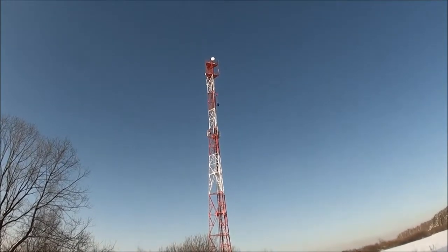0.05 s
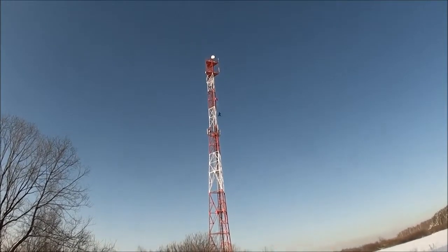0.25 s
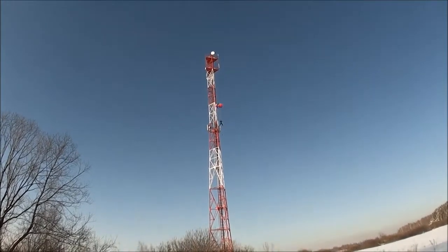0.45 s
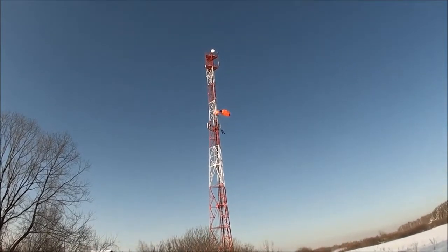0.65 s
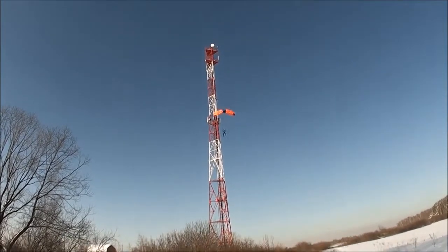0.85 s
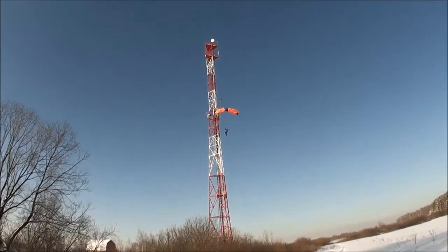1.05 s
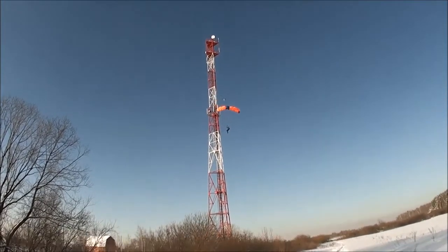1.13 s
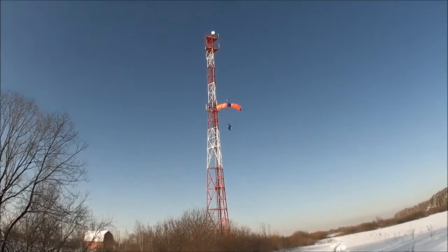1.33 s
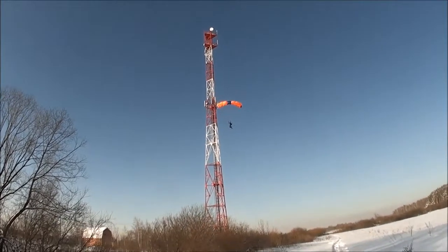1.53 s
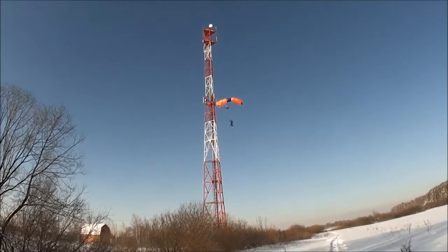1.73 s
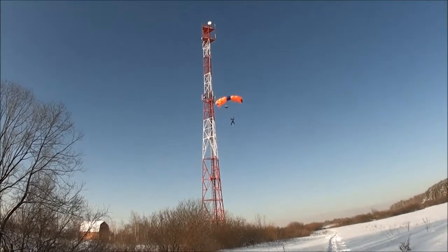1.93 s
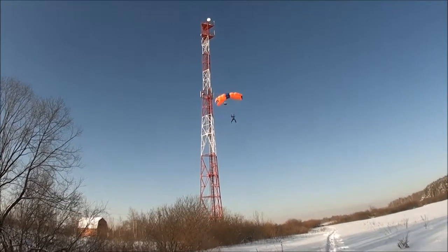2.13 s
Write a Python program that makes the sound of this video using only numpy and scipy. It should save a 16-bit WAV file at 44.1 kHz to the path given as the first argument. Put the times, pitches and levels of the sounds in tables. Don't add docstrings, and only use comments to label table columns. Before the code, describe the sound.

Parachute fabric bursts open with flapping and sharp cracks outdoors, while a nearby camera shutter fires five times

```python
import sys
import numpy as np
from scipy import signal
from scipy.fft import rfft, irfft
from scipy.io import wavfile
from scipy.ndimage import uniform_filter1d

SR = 44100
rng = np.random.default_rng(int(sys.argv[2]) if len(sys.argv) > 2 else 0)


def magnitude_from_level(level_db):
    exponent = np.asarray(level_db, float) / 20
    return 10 ** exponent


def wav_record(signal):
    frames = np.transpose(np.atleast_2d(signal))
    bounded = np.clip(frames, -1, 1)
    quanta = np.round(bounded * 32767).astype(np.int16)
    wavfile.write(sys.argv[1], SR, quanta)


N = 97020

# start_s, level_db, extra_wait_before_curtains_s
FRAME_SHOTS = [
    (0.2386, -1.5, 0.001073),
    (0.5485, -2.5, 0.0013),
    (0.8594, -4.5, 0.0011),
    (1.5096, -3, 0.000325),
    (1.8177, -2.5, 0.00018),
]
# time_after_slap_s, thump_db, snap_db, ring_db, rattle_t60_s
FRAME_BLOWS = [
    (-.021, -23, -18, -40, 0.16),
    (0, -18, -11.5, -14, 0.038),
    (.010, -7.5, -18.5, -27, 0.056),
    (.027, -42, -25, -18.5, 0.06),
    (.0332, -10.5, -7.5, -42, 0.058),
    (.0435, -11, -9.5, -17, 0.055),
    (.0998, -24.5, -12, -5.5, 0.066),
    (.107, -12.5, -20, -10.5, 0.17),
]
# time_after_slap_s, level_db
CURTAIN_STOPS = [
    (0, -5),
    (.0335, -3),
    (.0438, -3),
    (.1, -7),
]
# pitch_hz, level_db, t60_s
BODY_THUMP = [(280.2, -4.5, 0.054), (370.4, -3.5, 0.015), (700, -5.5, 0.0086), (838.5, -7, 0.061)]
BODY_RING = [(1807, -6.5, 0.041), (2913, 0, 0.014), (3580, 3, 0.019), (3787, -17.5, 0.073),
             (4010, 3.5, 0.0097), (5220, -7.5, 0.026)]
MIRROR_SLAP = [(270, -10, 0.019), (293, -30.5, 0.17), (242, -12.5, 0.14), (390, -6, 0.0071),
               (870, -24, 0.024)]
MIRROR_KNOCK = [(556, -1.5, 0.0035), (742, -13, 0.048)]
CURTAIN_BLADES = [(4520, -6, 0.01), (5080, -11.5, 0.013), (6200, -18, 0.0058), (7200, -24, 0.013),
                  (8520, -7.5, 0.011), (9660, -12, 0.013), (14900, -22, .008), (15600, -28, .006)]
SHUTTER_BUTTON = [(985, -20, 0.023), (1400, -29, 0.014), (2120, -26, 0.019), (3780, -38, 0.011)]
# pitch_hz, level_db
SNAP_TONE = [(350, -47.5), (600, 3), (2500, -2.5), (4580, -8), (5400, -6.5), (9620, -5), (12200, -29.5),
             (14500, -36), (16000, -39)]
GRIND_TONE = [(88, -1), (150, 9.5), (1260, -1.5), (1980, 8), (2500, 0), (3840, -0.5), (5050, -1),
              (5790, -5), (16000, -22.5)]
# time_after_slap_s, gear_mesh_hz, level_db, whine_share_db
MOTOR_WIND_UP = [(-.054, 1400, -34, -14), (-.042, 1529, -32.5, 5), (-.026, 1980, -30.5, 3.5),
                 (-.016, 2150, -32, -6), (-.002, 2200, -22.5, -36), (0.018, 2200, -24, -10)]
MOTOR_RECOCK = [(.05, 1800, -45, -1), (.066, 2000, -30.5, -12), (.076, 2070, -27, 0.5),
                (.094, 1750, -24.5, 1.5), (0.112, 1760, -26, -15), (.124, 1880, -32.5, 7.5),
                (.158, 1955, -29.5, 5), (0.173, 1897, -28.5, 2), (.187, 1540, -41, -3)]
# multiple_of_mesh, level_db
RECOCK_WHINE = [(.44, -7), (.9, -7), (1, -8), (2, -3), (3, 0.5), (4, -13)]
WIND_UP_WHINE = [(1, -6.5), (2, -1), (3, -0.5), (4, -22)]
# time_s, flap_level_db, rustle_minus_flap_db
CANOPY_COURSE = [(0.304, -51.5, 2), (0.46, -45, -0.5), (.66, -30, 2), (0.731, -26.5, -0.5),
                 (0.793, -20.5, -4), (0.829, -21, 2.5), (0.869, -14.5, -3), (0.925, -18.5, 0),
                 (.96, -23.5, 2), (1.03, -24.5, 3.5), (1.053, -27.5, 6.5), (1.098, -25.5, -0.5),
                 (1.195, -21.5, -8), (1.23, -33.5, 0.5), (1.3, -38, 2), (1.37, -41.5, -1.5),
                 (1.44, -38.5, -5.5), (1.749, -76, -1)]
# time_s, peak_db, pitch_hz
LOOSE_FLAPS = [(0.803, -10, 256), (0.83, -8, 228), (0.836, -14, 242), (.851, -5.5, 659), (.866, -4.5, 263),
               (0.878, -13.5, 238), (.885, -4, 197), (0.91, -2, 732), (1.038, -14, 228), (1.125, -14, 453),
               (1.161, -10.5, 223), (1.176, -12.5, 257), (1.19, -17.5, 296), (1.203, -14, 700),
               (1.214, -16, 198), (1.228, -31, 258), (1.257, -25, 800), (1.273, -27, 504),
               (1.342, -30, 536), (1.425, -32, 255), (1.444, -36, 300)]
# time_s, level_db
FABRIC_CRACKS = [(.741, -19), (.842, -18), (.861, -15), (.912, -24), (0.918, -17), (.995, -14),
                 (1.028, -27), (1.041, -11), (1.054, -9.5), (1.066, -20), (1.124, -13.5), (1.131, -20),
                 (1.143, -16), (1.256, -27), (1.338, -36), (1.404, -36), (1.469, -30)]
# pitch_hz, level_db
FLAP_TONE = [(40, -26), (100, -2), (174, 5), (270, 2), (459, -9.5), (650, -1), (1710, -23), (5000, -73)]
RUSTLE_TONE = [(350, -17), (700, 4.5), (1500, 0.5), (2600, -6.5), (3600, -7), (8000, -17), (11000, -31),
               (16000, -59)]
RUMBLE_TONE = [(24, -57), (40, -19), (92, -16), (127, -7), (203, -4.5), (314, -4.5), (475, -15),
               (605, -10.5), (2500, -36), (3250, -61), (5500, -120)]
HISS_TONE = [(1200, 4), (1800, 1), (2600, -3.5), (3500, -1.5), (6400, -4.5), (9000, -6.5), (12000, -9.5),
             (16300, -12.5)]
# pitch_hz, level_db
MIC_TONE = [(30, -12.5), (140, -5), (330, 3.5), (470, 0), (650, -0.5), (2000, -1.5), (2600, -6), (3100, 3)]
# pitch_hz, level_db
CAMERA_ASIDE = [(150, -18), (600, -19), (1300, 2.5), (2400, -3), (4500, -6.5), (8000, -8.5), (12000, -12)]

GRIND_DB, WHINE_DB = -1, -5
WOBBLE_DB, FLUTTER = 3.8, .006
SLAP_LAG_S, KNOCK_LAG_S = .0021, .0014
SNAP_T60_S, RISE_S, RING_RISE_S = .011, .0014, .0018
BOUNCE_THUMP_DB = -9
LATCH_S, LATCH_LENGTH_S, LATCH_HZ, LATCH_DB = .002, .014, 4510, -31.5
BUTTON_S = .1752
FLAPS_PER_S, CRACKLES_PER_S = 500, 3000
FLAP_SPREAD_DB, CRACKLE_SPREAD_DB, GUST_DB = 1.5, 2.2, 3.2
RUMBLE_DB, HISS_DB, DRIFT_DB = -44, -49, 1.6
ECHO_DB, ECHO_T60_S = -14, .15
ASIDE_TURN = 1.15
CEILING, TOP_HZ = 1.15, 15900


def noise(size):
    return rng.standard_normal(size)


def colour(x, points):
    p = np.array(points)
    hz = np.arange(1025) * SR / 2048 + 1
    db = np.interp(np.log(hz), np.log(p[:, 0]), p[:, 1], left=p[0, 1] - 20)
    c = irfft(np.log(magnitude_from_level(db)))
    c[1:1024] *= 2
    c[1025:] = 0
    h = irfft(np.exp(rfft(c)))
    return signal.fftconvolve(x, h / np.sqrt(np.sum(h ** 2)))[:len(x)]


def fade(t, t60):
    return (t >= 0) * np.exp(-np.log(1000) * np.abs(t) / t60)


def rise(t, length_s):
    return np.clip(t / length_s, 0, 1)


def modes(t, table):
    out = 0
    for hz, db, t60 in table:
        pitch = hz * (1 + 0.017 * rng.standard_normal())
        out = out + magnitude_from_level(db) * fade(t, t60) * np.sin(2 * np.pi * pitch * t)
    return out


def walk(rate, size):
    k = int(SR / rate)
    w = uniform_filter1d(uniform_filter1d(noise(size), k), k)
    return w / w.std()


def motor(t, run, orders):
    s, mesh_hz, db, share_db = np.array(run).T
    speed = np.interp(t, s, mesh_hz) * (1 + FLUTTER * walk(200, len(t)))
    phase = 2 * np.pi * np.cumsum(speed) / SR
    whine = sum(magnitude_from_level(d + WOBBLE_DB * walk(380, len(t))) * np.sin(k * phase) for k, d in orders)
    grind = colour(noise(len(t)), GRIND_TONE) * magnitude_from_level(2.0 * walk(180, len(t)))
    loudness = magnitude_from_level(np.interp(t, s, db, left=-99, right=-99))
    return loudness * (magnitude_from_level(WHINE_DB + np.interp(t, s, share_db)) * whine + magnitude_from_level(GRIND_DB) * grind)


def latch(t):
    shape = np.exp(-((t - LATCH_S) / LATCH_LENGTH_S) ** 4)
    return magnitude_from_level(LATCH_DB + 4.7 * walk(250, len(t))) * shape * np.sin(2 * np.pi * LATCH_HZ * t)


def blow(t, time_s, thump_db, snap_db, ring_db, t60):
    if time_s < .03:
        thump_db = thump_db + BOUNCE_THUMP_DB
    thump = -magnitude_from_level(thump_db) * modes(t - .0015, BODY_THUMP)
    decay = fade(t, SNAP_T60_S) + magnitude_from_level(-5.5) * fade(t, t60)
    snap = rise(t, RISE_S) * decay * colour(noise(len(t)), SNAP_TONE)
    ring = rise(t, RING_RISE_S) * modes(t, BODY_RING)
    return thump + magnitude_from_level(snap_db) * snap + magnitude_from_level(ring_db) * ring


def curtains(t, wait):
    out = 0
    for s, db in CURTAIN_STOPS:
        v = t - s - wait * (s > 0)
        out = out + magnitude_from_level(db) * rise(v, RISE_S) * modes(v, CURTAIN_BLADES)
    return out


def camera():
    out, t = np.zeros(N), np.arange(N) / SR
    for start, gain_db, wait in FRAME_SHOTS:
        part = slice(int((start - .08) * SR), int((start + .3) * SR))
        u = t[part] - start
        x = motor(u, MOTOR_WIND_UP, WIND_UP_WHINE) + motor(u, MOTOR_RECOCK, RECOCK_WHINE)
        x = x + modes(u - SLAP_LAG_S, MIRROR_SLAP) - modes(u - KNOCK_LAG_S, MIRROR_KNOCK)
        x = x + latch(u)
        for s, thump_db, snap_db, ring_db, t60 in FRAME_BLOWS:
            v = u - s - wait * (s > .02)
            x = x + blow(v, s, thump_db, snap_db, ring_db, t60)
        x = x + curtains(u, wait)
        out[part] += magnitude_from_level(gain_db) * x
    return out + modes(t - BUTTON_S, SHUTTER_BUTTON)


def grains(rate, spread_db):
    r = rng.random((3, N))
    clicks = (r[0] < rate / SR) * np.sign(r[1] - .5) * magnitude_from_level(-spread_db * np.log(r[2] + 1e-4))
    return clicks / np.sqrt(np.mean(clicks ** 2))


def loose_flaps(t):
    out = 0
    for s, db, hz in LOOSE_FLAPS:
        v = t - s - .001
        out = out - magnitude_from_level(db) * np.cos(2 * np.pi * hz * v) * np.exp(-(v * hz / 0.56) ** 2)
    return out


def canopy():
    t = np.arange(N) / SR
    s, db, rustle_db = np.array(CANOPY_COURSE).T
    gate = rise(t - .25, 0.12) * rise(2.1 - t, 0.12)
    flaps = colour(grains(FLAPS_PER_S, FLAP_SPREAD_DB), FLAP_TONE) * magnitude_from_level(2.0 * walk(39.5, N))
    rustle = colour(grains(CRACKLES_PER_S, CRACKLE_SPREAD_DB), RUSTLE_TONE)
    rustle = rustle * magnitude_from_level(np.interp(t, s, rustle_db) + GUST_DB * walk(53, N))
    claps = loose_flaps(t)
    crack_shape = sum(magnitude_from_level(d) * fade(t - a, 0.013) for a, d in FABRIC_CRACKS)
    cracks = colour(crack_shape * noise(N), RUSTLE_TONE)
    return gate * magnitude_from_level(np.interp(t, s, db)) * (flaps + rustle) + claps + cracks


def echo(x):
    u = np.arange(8192) / SR
    tails = rng.standard_normal((2, len(u))) * fade(u - .002, ECHO_T60_S)
    mids = signal.lfilter(*signal.butter(1, [700, 5000], "band", fs=SR), x)
    return np.array([signal.fftconvolve(mids, h / np.sqrt(np.sum(h ** 2)))[:N] for h in tails])


def field():
    mid, side, a, b = rng.standard_normal((4, N))
    rumble = colour(mid, RUMBLE_TONE) * magnitude_from_level(RUMBLE_DB + DRIFT_DB * walk(20.0, N))
    wide_rumble = colour(side, RUMBLE_TONE) * magnitude_from_level(RUMBLE_DB - 15.5)
    hiss = colour(a, HISS_TONE) * magnitude_from_level(HISS_DB)
    wide_hiss = colour(b, HISS_TONE) * magnitude_from_level(HISS_DB - 10.5)
    shared, wide = rumble + hiss, wide_rumble + wide_hiss
    return np.array([shared + wide, shared - wide])


def scene():
    cam, chute = camera(), canopy()
    hz = np.arange(N // 2 + 1) * SR / N + 1
    f, db = np.array(CAMERA_ASIDE).T
    aside = magnitude_from_level(np.interp(np.log(hz), np.log(f), db)) * np.exp(-1j * ASIDE_TURN)
    side = -irfft(rfft(cam) * aside, N)
    wet = echo(cam + 1.36 * chute)
    near = np.array([cam + side, cam - side]) + chute + magnitude_from_level(ECHO_DB) * wet
    return np.array([colour(c, MIC_TONE) for c in near]) + field()


def roll_off(x):
    return signal.sosfilt(signal.butter(12, 16700, fs=SR, output="sos"), x)


def record(dry):
    rounded = np.tanh(dry / CEILING) * CEILING
    mix = signal.sosfilt(signal.ellip(8, .2, 70, TOP_HZ, fs=SR, output="sos"), rounded)
    return roll_off(mix)


dry = scene()
out = record(dry)
wav_record(out)
```